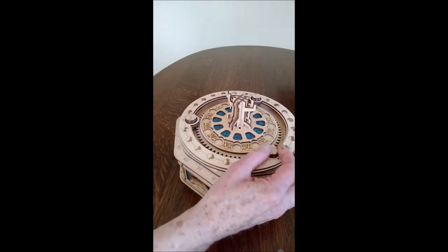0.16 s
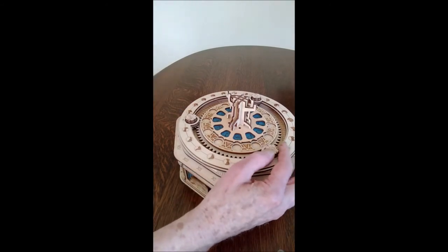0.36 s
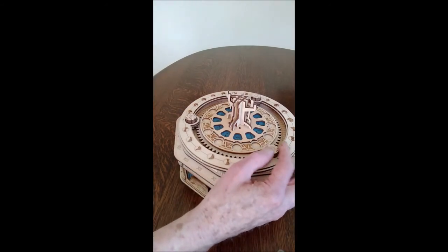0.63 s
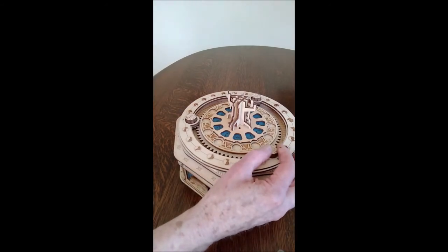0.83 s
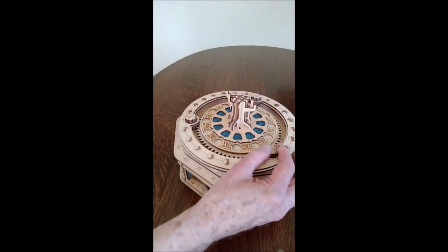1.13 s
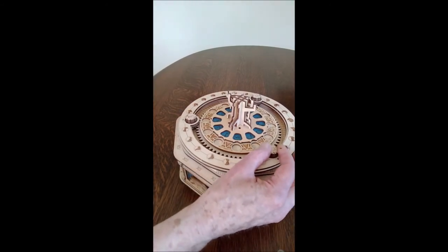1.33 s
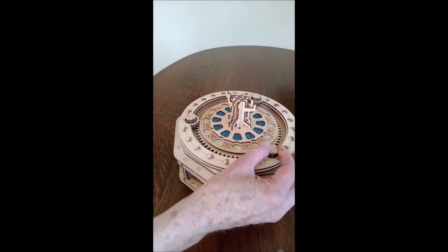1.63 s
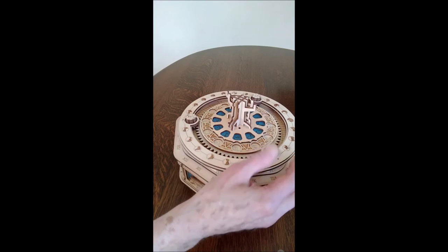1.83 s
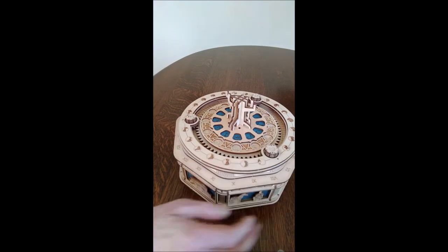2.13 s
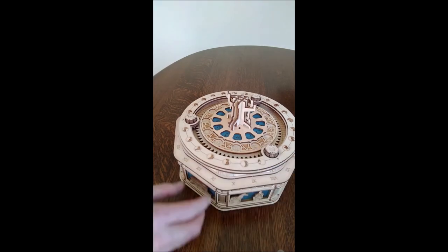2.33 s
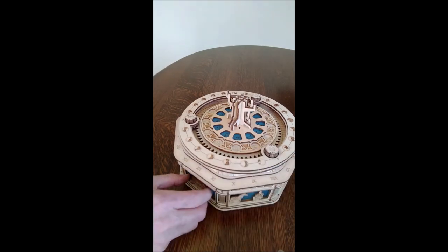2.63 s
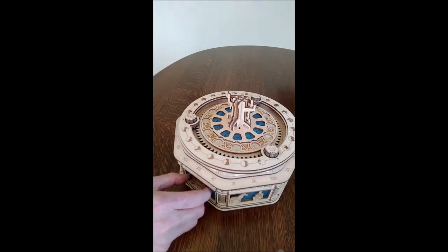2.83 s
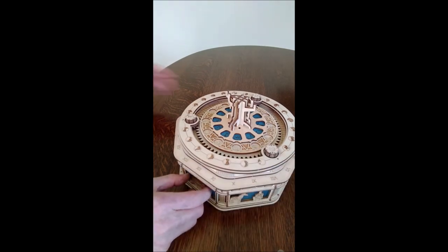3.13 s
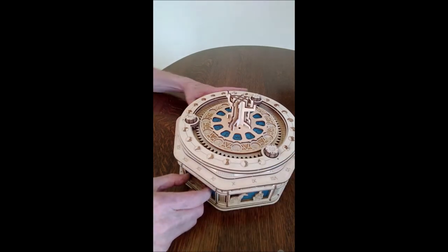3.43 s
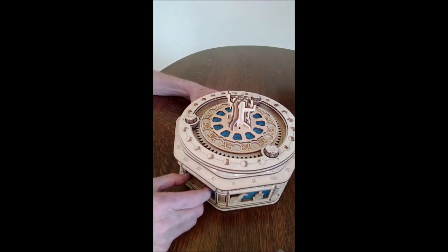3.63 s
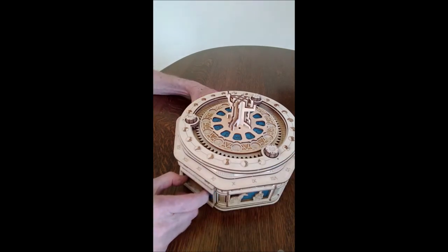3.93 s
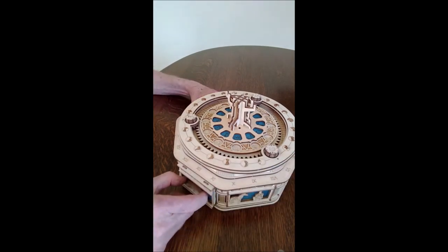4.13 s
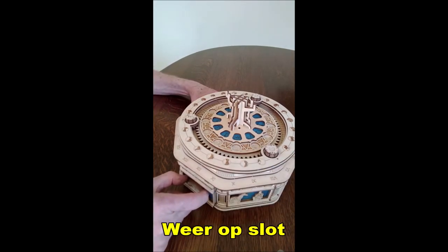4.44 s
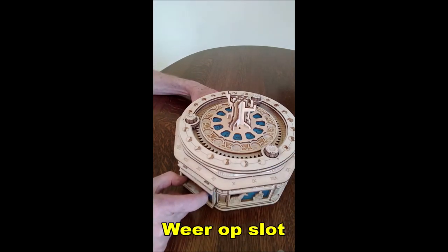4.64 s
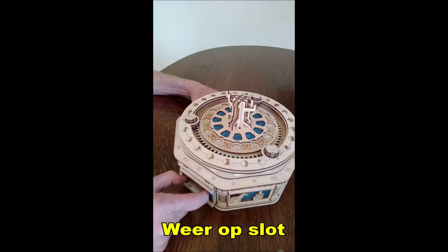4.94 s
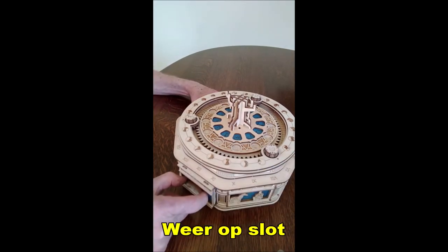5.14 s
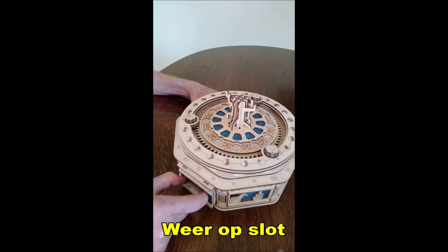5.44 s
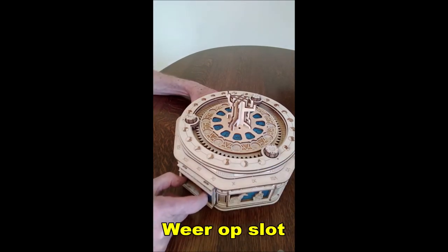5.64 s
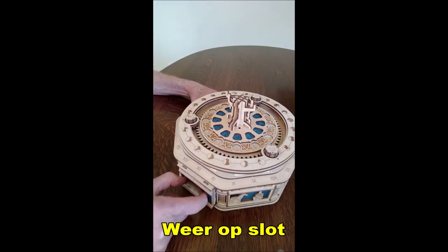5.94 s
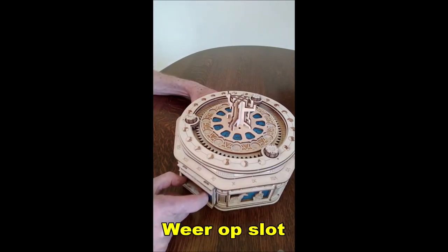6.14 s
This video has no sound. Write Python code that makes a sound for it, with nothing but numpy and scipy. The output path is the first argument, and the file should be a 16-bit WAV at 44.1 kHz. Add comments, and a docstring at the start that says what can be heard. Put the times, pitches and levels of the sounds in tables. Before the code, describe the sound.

Dry wooden handling sounds, recorded near by a stereo phone microphone: brief scrapes and tiny clicks from a carved ring, a calmer stretch with a few soft touches, then a slide and a click as a drawer moves. It then bumps repeatedly against its lock, hollow panel knocks with a small table thud and quick rebound. Steady hum, throbbing low drone and faint hiss lie underneath, with little reverberation.

```python
"""In a quiet room, a plywood puzzle box on a table: a hand slides over its ring and drawer, small parts tick,
then the drawer is knocked against its lock again and again. Slides are dense noise grains; ticks and knocks
strike ringing modes of panels, edges and table top. An appliance hums over hiss, room tone and a throbbing
drone. A two-port phone microphone makes stereo by subtracting from each port the delayed other one."""
import sys
import numpy as np
from scipy import signal
from scipy.fft import rfft, irfft, next_fast_len
from scipy.io import wavfile

SR = 44100
rng = np.random.default_rng(int(sys.argv[2]) if len(sys.argv) > 2 else 0)


def store_pcm(level_fs):
    """Save levels as 16-bit WAV."""
    pcm = np.round(np.clip(level_fs, -1, 1) * 32767).astype(np.int16)
    wavfile.write(sys.argv[1], SR, np.atleast_2d(pcm).T)


N = 276507
SIZE = next_fast_len(N + SR)      # transform length, with room for tails
HZ = np.maximum(np.arange(SIZE // 2 + 1) * SR / SIZE, 1)

# the background swells while things move: start_s, level_db (relative)
SWELL_POINTS = [(0.0, -71), (0.77, -70.5), (1.24, -73.5), (1.83, -73.5), (2.01, -73), (2.55, -72),
                (3.47, -74), (3.77, -74.5), (3.93, -70.5), (5.43, -68.5), (6.27, -70)]
# how much the two ports differ for room sound: pitch_hz, level_db (relative to their sum)
PORT_DIFFERENCE = [(30, -37), (100, -36), (250, -14), (600, -3.5), (1500, 3), (4000, -2)]
# the drawer knocks against its lock: start_s, level_db (relative), ring_centre_hz,
# crack_db and thud_db (both relative to the blow)
DRAWER_KNOCKS = [(4.6049, -21.5, 700, -27.5, -11), (4.89, -23.5, 725, -26, -9), (5.149, -20, 740, -29, -10),
                 (5.404, -22, 765, -19.5, -12), (5.664, -22.5, 770, -27.5, -9), (5.911, -22, 890, -16, -4)]


def amp(db):
    """Decibels to an amplitude factor."""
    return 10 ** (np.asarray(db) / 20)


def rms_one(x):
    """Scale to an rms of 1."""
    return x / np.sqrt(np.mean(x ** 2) + 1e-20)


def in_time(rows):
    """Draw each column of a timed table as a curve of straight lines."""
    s, *columns = np.transpose(rows)
    return [np.interp(np.arange(N) / SR, s, c) for c in columns]


def at_hz(points, hz=HZ):
    """Read a curve over log frequency."""
    point_hz, values = np.array(points).T
    return np.interp(np.log(hz), np.log(point_hz), values)


def through(x, response):
    """Filter by a frequency response."""
    return irfft(rfft(x, SIZE) * response, SIZE)[..., :N]


def late(s):
    """Response of a delay in seconds."""
    return np.exp(-2j * np.pi * HZ * s)


def drift(rate_hz):
    """Slow chance of spread 1: noise through two equal low-pass poles, drawn every 40 samples."""
    r = np.exp(-80 * np.pi * rate_hz / SR)
    noise = rng.standard_normal(N // 40 + 2002)
    slow = signal.lfilter([1], [1, -2 * r, r * r], noise)[2000:]
    return np.interp(np.arange(N) / 40, np.arange(len(slow)), rms_one(slow))


def diffuse(spectrum):
    """Sound from all around at the two ports: alike in the bass, unrelated in the treble."""
    both, apart = rng.standard_normal((2, N))
    both = through(both, amp(at_hz(spectrum)))
    apart = through(apart, amp(at_hz(spectrum) + at_hz(PORT_DIFFERENCE)))
    return np.array([both + apart, both - apart]) / np.std(both)


def port_hiss():
    """Each port hisses independently, flickering slightly; the left one is duller."""
    # colour of the hiss: pitch_hz, level_db (per Hz, relative)
    hiss_colour = [(30, -21), (300, 24), (700, 13), (1200, -2.5), (2500, 14.5), (5000, 14.5), (8000, 11),
                   (11000, 10.5), (16000, 11.5)]
    hiss = rms_one(through(rng.standard_normal((2, N)), amp(at_hz(hiss_colour))))
    hiss[0] = through(hiss[0], 1 / (1 + 1j * HZ / 11000))
    flicker_db = 1.3 * drift(16.4)
    return amp(6 + flicker_db) * hiss


def room_tone():
    """The quiet air of the room: coloured noise from all around."""
    # colour of the room tone: pitch_hz, level_db (per Hz, relative)
    air_colour = [(20, -44), (35, -13), (55, 0.5), (80, -13), (150, 0), (200, -1.5), (320, 1), (420, -21),
                  (800, -17), (1500, -22.5), (4000, -39)]
    return amp(12.5) * diffuse(air_colour)


def appliance_hum():
    """A sine whose pitch and level waver, a little louder at the right port."""
    hum_hz, hum_db = 97.8, 13.5
    phase = 2 * np.pi * np.cumsum(hum_hz + 1.12 * drift(1.9)) / SR
    level = amp(hum_db + 1.2 * drift(2.6))
    return level * np.sin(phase) * amp([[-.9], [.9]])


def drone():
    """Noise in one narrow spectral peak, throbbing in level."""
    centre_hz, width_hz, level_db = 261, 48.3, 15
    grid_hz = np.geomspace(100, 700, 200)
    peak_db = -20 * np.log10(1 + (2 * (grid_hz - centre_hz) / width_hz) ** 2)
    peak = np.column_stack([grid_hz, peak_db])
    return amp(level_db + 2.8 * drift(64)) * diffuse(peak)


def background():
    """Port hiss, room tone, hum and drone, all swelling together."""
    swell = amp(in_time(SWELL_POINTS)[0])
    return swell * (port_hiss() + room_tone() + appliance_hum() + drone())


def grains(per_s, spread_db, spectrum):
    """Dense uneven slips of two surfaces, coloured by the body; rms 1."""
    sizes = amp(spread_db * np.minimum(rng.exponential(1, N), 4)) * rng.standard_normal(N)
    slips = sizes * (rng.random(N) < per_s / SR)
    return rms_one(through(slips, amp(at_hz(spectrum))))


def sliding():
    """Wood rubs on wood in stutters; skin hisses over the carved ring, a wide source that differs at the ports."""
    # hand and drawer strokes: start_s, length_s, rub_db, skin_db (relative)
    strokes = [(0.0, 0.053, -58, -72), (0.207, 0.067, -52.5, -62.5), (.3, 0.056, -74, -72),
               (0.376, 0.013, -54.5, -86), (.505, 0.056, -57.5, -61), (0.596, 0.15, -64, -76),
               (0.808, 0.13, -63.5, -67.5), (1.137, 0.22, -74.5, -77.5), (1.797, 0.068, -70, -69.5),
               (2.015, 0.024, -58, -60.5), (2.06, 0.042, -73, -75), (2.396, 0.02, -58, -54),
               (2.433, 0.074, -70, -66.5), (2.59, 0.061, -68, -68.5), (2.903, 0.13, -75, -71.5),
               (3.721, 0.11, -58.5, -71.5), (3.938, 0.1, -60.5, -67.5), (4.11, 0.15, -62, -90),
               (4.327, 0.12, -65.5, -88), (4.624, 0.16, -58, -88), (4.727, 0.16, -63.5, -70.5),
               (4.916, .05, -60, -88), (4.998, 0.047, -57, -71), (5.182, 0.1, -58, -88),
               (5.277, 0.037, -60.5, -70), (5.402, 0.07, -53.5, -75), (5.518, 0.062, -59.5, -67.5),
               (5.685, 0.15, -61, -92), (5.92, 0.14, -56, -71), (6.242, 0.045, -63, -70.5)]
    # colour of wood on wood: pitch_hz, level_db (per Hz, relative)
    rub_colour = [(150, -5), (300, 4.5), (480, 7), (720, 5.5), (1050, 1.5), (1400, -4.5), (1800, -20),
                  (2500, -2.5), (5000, -91)]
    # colour of skin on wood: pitch_hz, level_db (per Hz, relative)
    skin_colour = [(400, -28), (800, -6), (1500, -2.5), (3000, -0.5), (6000, -6.5), (7500, -9),
                   (10000, -26.5), (16000, -16)]
    rise_db_per_s, fade_db_per_s = 1800, 332
    t = np.arange(N) / SR
    rub_gain, skin_gain = 0, 0
    for start, length, rub_db, skin_db in strokes:
        rise_db = -rise_db_per_s * np.maximum(start - t, 0)
        fade_db = -fade_db_per_s * np.maximum(t - start - length, 0)
        shape = amp(rise_db + fade_db)
        rub_gain = np.maximum(rub_gain, amp(rub_db) * shape)
        skin_gain = np.maximum(skin_gain, amp(skin_db) * shape)
    rub = rub_gain * amp(3.35 * drift(38)) * grains(3500, 1.32, rub_colour)
    # opposite signs at the two ports widen the skin
    width = amp(-0.5) * grains(12000, 0.99, skin_colour) * [[1], [-1]]
    skin = grains(12000, 2.25, skin_colour) + width
    return rub + skin_gain * amp(0.93 * drift(39)) * skin


def ring(clicks, hz, t60):
    """A unit click sets a sine of height 1 ringing, down 60 dB after t60 seconds."""
    r, w = amp(-60 / (t60 * SR)), 2 * np.pi * hz / SR
    return signal.lfilter([0, np.sin(w)], [1, -2 * r * np.cos(w), r * r], clicks + 1e-18)


def strike(s, modes, level_db, centre_hz, focus_db, contact_s):
    """Every blow strikes each mode with its own strength, most near the centre of its ring."""
    at = (s * SR).astype(int)
    luck_db = 2 * rng.standard_normal((len(at), len(modes)))
    out = np.zeros(N)
    for k, (hz, mode_db, t60) in enumerate(modes):
        clicks = np.zeros(N)
        off_db = focus_db * np.log2(hz / centre_hz) ** 2      # focus is in dB per octave squared
        clicks[at] = amp(level_db + mode_db - off_db + luck_db[:, k])
        out += ring(clicks, hz, t60)
    push = np.hanning(int(contact_s * SR) + 3)      # wood gives way: the force is a short bump
    return signal.lfilter(push / push.sum(), [1], out)


def radiate(x, low_hz):
    """A small body sends out little sound below its lowest mode."""
    return signal.sosfilt(signal.butter(3, low_hz, "high", fs=SR, output="sos"), x)


def blows(rows, focus_db, crack_hz, crack_focus_db):
    """Panels knock, thin edges crack, the table top thuds."""
    # box panels: pitch_hz, level_db (relative), t60_s
    panel_modes = [(454, -27, 0.02), (672, -6.5, 0.022), (742, 3, 0.02), (908, -1.5, 0.015),
                   (1096, -5.5, 0.048), (1293, -1.5, 0.13), (1398, -10.5, 0.098), (1765, -0.5, 0.013)]
    # thin edges: pitch_hz, level_db (relative), t60_s
    edge_modes = [(2766, 4, 0.018), (2970, -1.5, 0.025), (3380, 0.5, 0.007), (4340, -5, 0.025),
                  (5850, 33, .008)]
    # table top: pitch_hz, level_db (relative), t60_s
    table_modes = [(127, -22, 0.48), (159.8, 7, 0.075), (220.3, -3, 0.26), (278.2, 3.5, 0.09),
                   (354.5, 1.5, 0.041), (407.6, -17.5, 0.2)]
    s, level_db, ring_hz, crack_db, thud_db = np.transpose(rows)
    panels = strike(s, panel_modes, level_db - 11.0, ring_hz, focus_db, contact_s=0.00037)
    # a part lands on one edge, then as hard on the other
    panels = panels + through(panels, late(0.001224))
    edges = strike(s, edge_modes, level_db + crack_db + 3.0, crack_hz, crack_focus_db, contact_s=0.00022)
    table = strike(s, table_modes, level_db + thud_db - 7.5, centre_hz=252, focus_db=6.5, contact_s=0.0005)
    return -(radiate(panels, low_hz=360) + radiate(edges, low_hz=2270) + radiate(table, low_hz=110))


def ticks():
    """Wooden ticks and knocks, faint to loud, with a narrowly focused crack."""
    # blows: start_s, level_db (relative), ring_centre_hz, crack_db and thud_db (both relative to the blow)
    part_ticks = [(0.074, -46.5, 875, -28, 1.5), (0.103, -40, 750, -31, -21), (0.204, -39.5, 670, 2, -4.5),
                  (0.253, -37, 736, -18, -1.5), (0.383, -40, 690, -32, -31), (0.458, -42, 1280, -30, -20),
                  (0.463, -38, 780, -22, -20), (0.508, -38.5, 940, -5, -10), (0.53, -37.5, 760, -22, -3.5),
                  (0.548, -48, 1200, -9, 1), (0.567, -45.5, 1300, -22, 3.5), (0.695, -42.5, 970, -25, -14),
                  (2.03, -45, 770, -12, -36), (2.388, -55, 800, -9, -21), (2.598, -53, 595, -38, -4),
                  (3.723, -32, 1330, -18, -16), (3.94, -46, 1300, -29, -1.5),
                  (4.0907, -34.5, 1010, -14, -0.5), (4.096, -45, 1100, -25, -9.5),
                  (4.103, -23.5, 580, -35, -42), (4.361, -41.5, 1350, -19, -9),
                  (4.769, -41.5, 690, -15, -5), (5.314, -46, 700, -10, -21), (5.9155, -23.5, 810, -20, -22),
                  (5.919, -27.5, 710, -32, -27), (6.251, -52, 654, -19, -17)]
    return blows(part_ticks, focus_db=18, crack_hz=3730, crack_focus_db=92)


def catch():
    """The catch drags for a moment, harder and harder, before it lets go and knocks."""
    # scrape of the catch: pitch_hz, level_db (per Hz, relative)
    scrape_colour = [(900, 1.5), (1400, -2), (2000, -11.5), (3500, -7), (4500, -7.5), (7000, -18),
                     (12000, -29)]
    drag_s, growth_s, drag_db = 0.054, 0.029, -31.5      # level relative to the knock
    s, level_db = np.transpose(DRAWER_KNOCKS)[:2]
    marks = np.zeros(N)
    marks[(s * SR).astype(int)] = amp(level_db + drag_db)
    decay = np.exp(-np.arange(int(drag_s * SR)) / (growth_s * SR))
    # run backwards in time, the decay becomes a rise into each knock
    rising = signal.fftconvolve(marks[::-1], decay)[:N][::-1]
    return rising * grains(3400, 0.47, scrape_colour)


def knocks():
    """The drawer hits its lock; each knock rebounds once, weaker."""
    bounce_s, bounce_db = 0.021, -21
    bounces = np.array(DRAWER_KNOCKS) + [bounce_s, bounce_db, 0, 0, 0]
    rows = np.vstack([DRAWER_KNOCKS, bounces])
    return blows(rows, focus_db=14.5, crack_hz=2710, crack_focus_db=21)


def room(x):
    """Dense reflections: noise that dies band by band after the first wall answers."""
    # reverberation time: pitch_hz, t60_s
    reverb_times = [(100, 1), (500, 0.28), (1500, 0.44), (4000, 0.22), (12000, 1)]
    t = np.arange(int(.8 * SR)) / SR
    tail = 0
    white = rng.standard_normal((2, len(t))) * (1 - np.exp(-(t / 0.0022) ** 2))
    for hz in 45 * 2 ** np.arange(9):
        # overlapping octaves that add up to one between the outer centres
        share = np.clip(1 - abs(np.log2(HZ / hz)), 0, 1)
        dying = white * amp(-60 * t / at_hz(reverb_times, hz))
        tail = tail + share * rfft(dying, SIZE)
    both, apart = tail[0], tail[1] * amp(at_hz(PORT_DIFFERENCE))
    return through(x, np.array([both + apart, both - apart]))


def scene():
    """Sum the sound at the two ports: direct hits and slides, their room sound, the background."""
    slides = sliding()
    hits = ticks() + catch() + knocks()
    # the box reaches the left port later, and louder
    ports = np.array([amp(3.5) * late(.00007), late(0)])
    direct = through(hits, ports) + slides
    return direct + amp(-33.5) * room(hits + slides.mean(axis=0)) + background()


def record(dry):
    """Each side is one port minus the delayed other; a shelf restores the bass, the top is cut."""
    port_lag_s, cutoff_hz = 0.0004276, 16150
    other = through(dry[::-1], .96 * late(port_lag_s) / (1 + (HZ / 14000) ** 2))
    shelf = (375 + 1j * HZ) / (40 + 1j * HZ)
    sides = through(dry - other, shelf) * amp([[-.4], [.4]])
    # a faint hiss of its own in each side
    fizz_db = in_time(SWELL_POINTS)[0] + np.array([[-1.5], [1.5]])
    fizz = amp(fizz_db) * rng.standard_normal((2, N))
    top_cut = signal.cheby2(20, 70, cutoff_hz, fs=SR, output="sos")
    return signal.sosfilt(top_cut, sides + fizz)


dry = scene()
out = record(dry)
store_pcm(out)
```